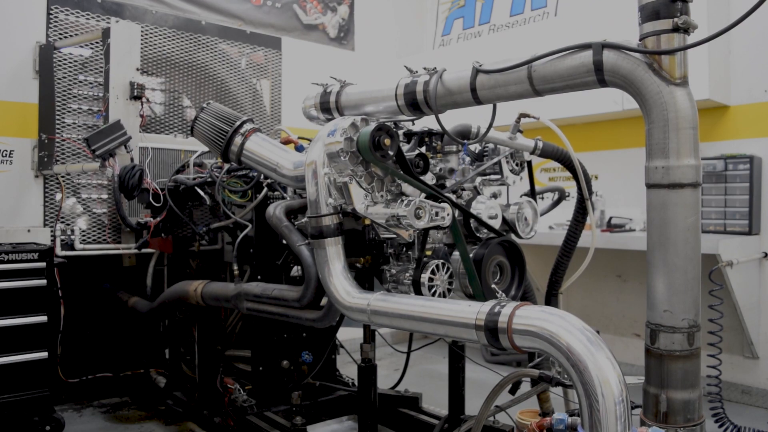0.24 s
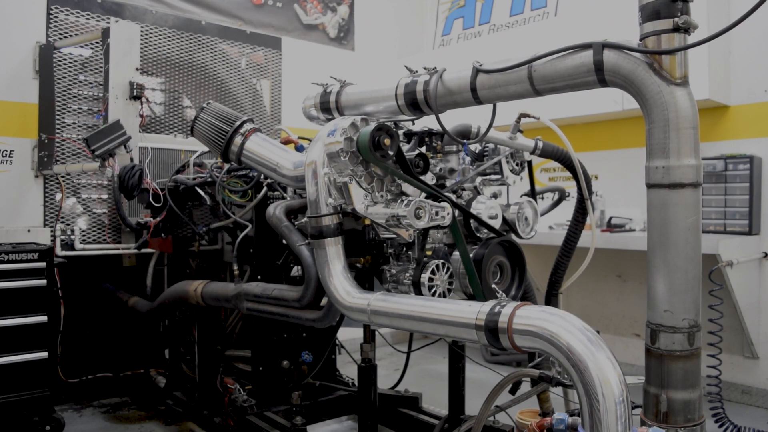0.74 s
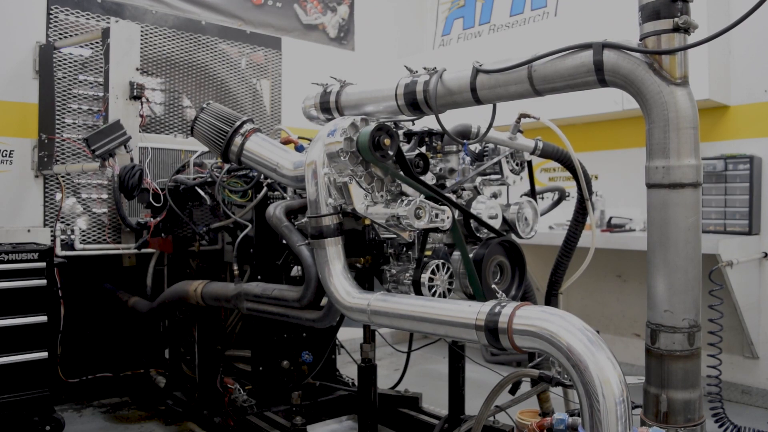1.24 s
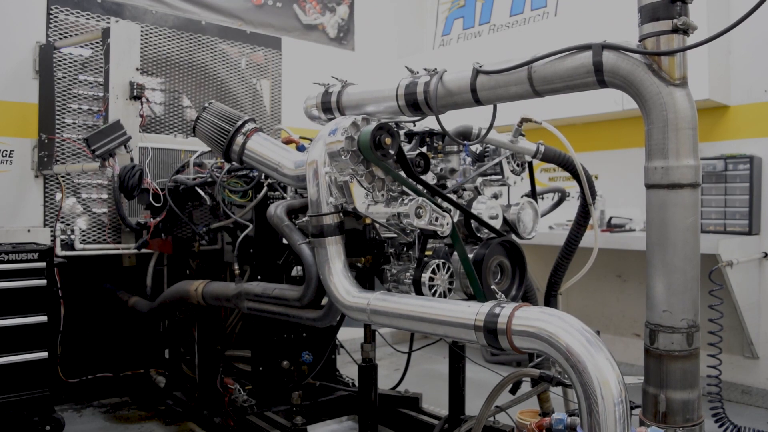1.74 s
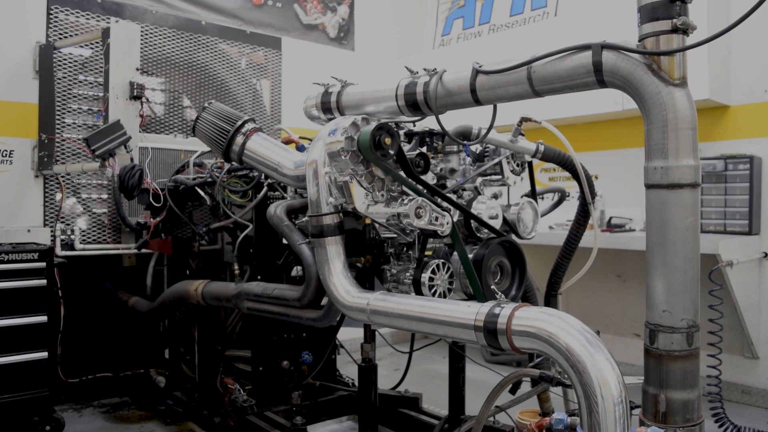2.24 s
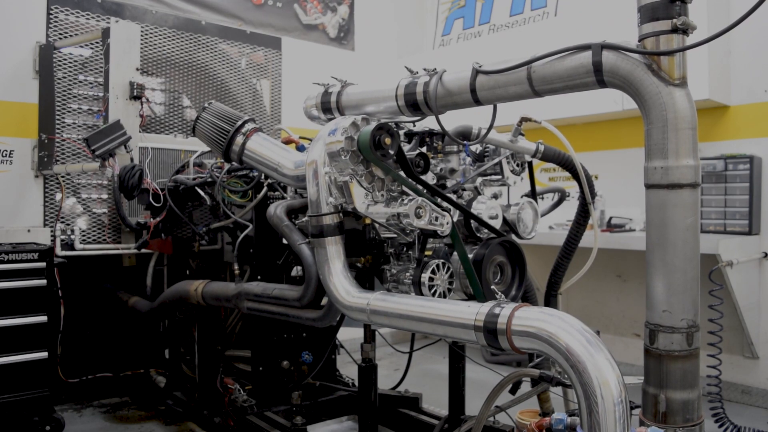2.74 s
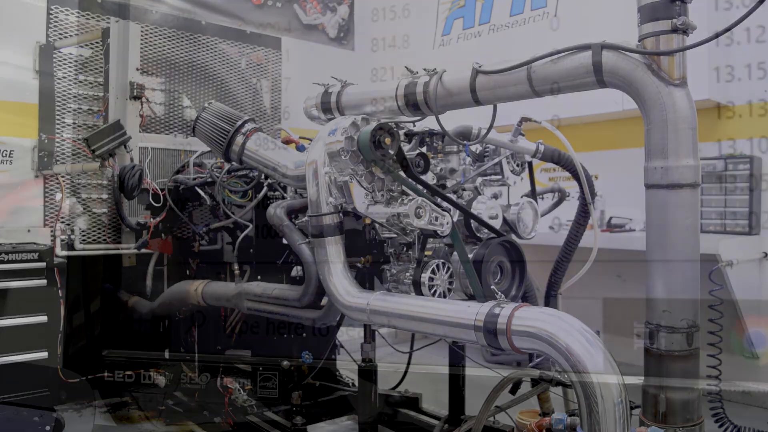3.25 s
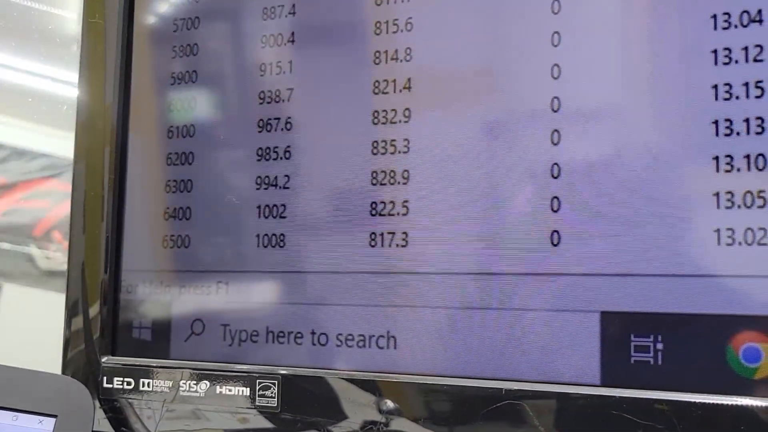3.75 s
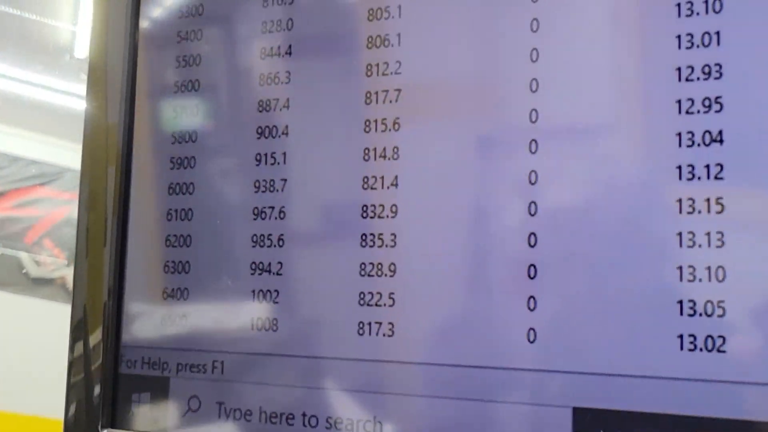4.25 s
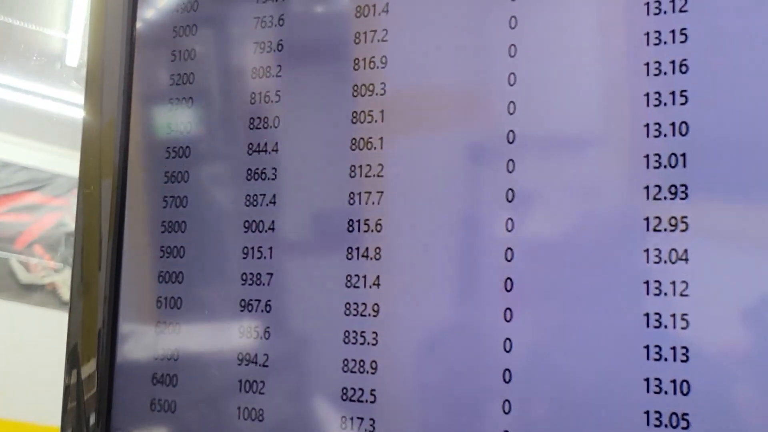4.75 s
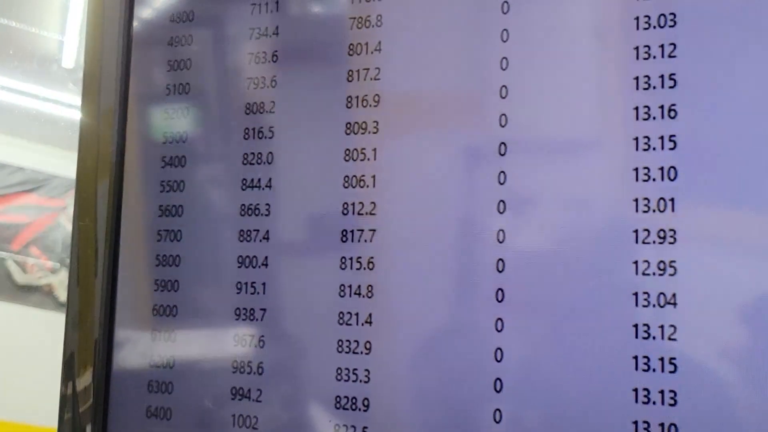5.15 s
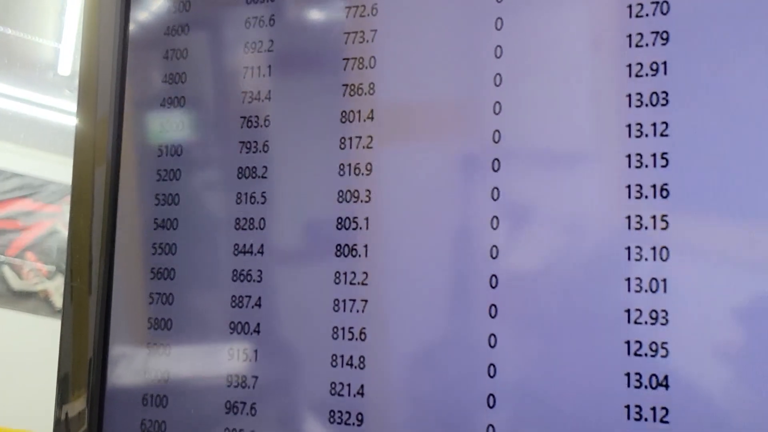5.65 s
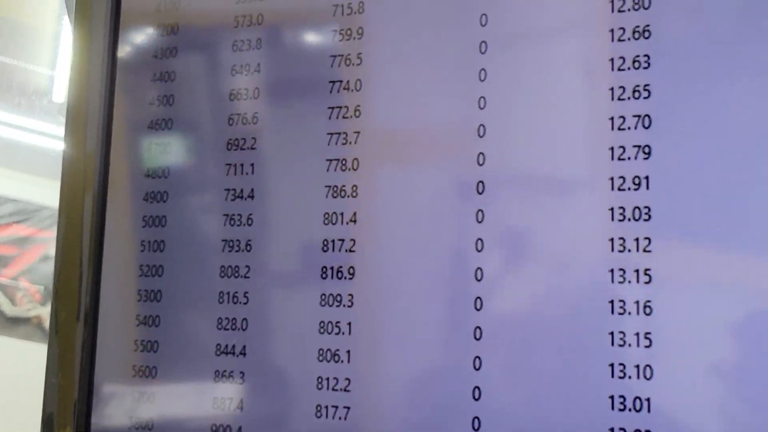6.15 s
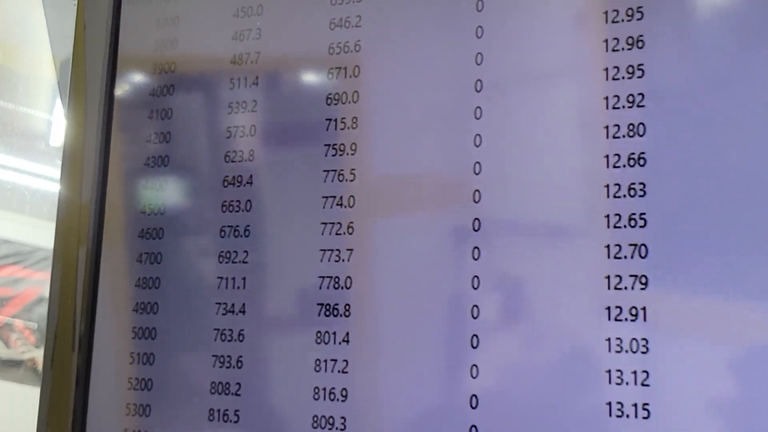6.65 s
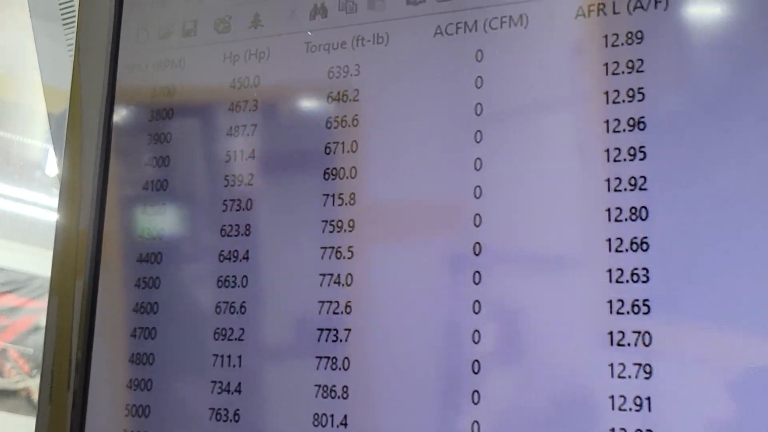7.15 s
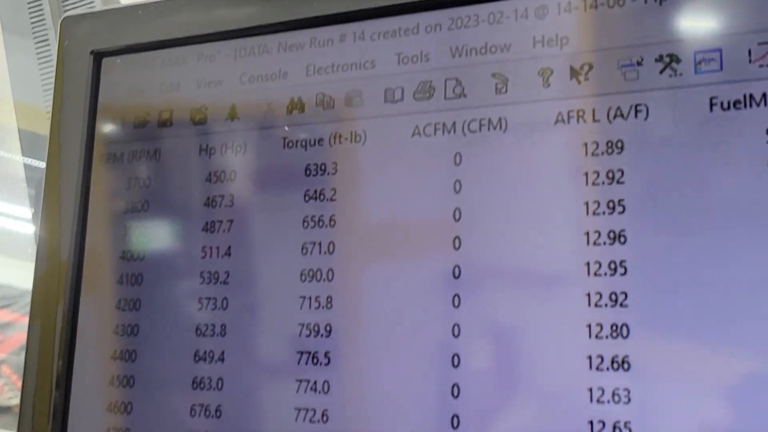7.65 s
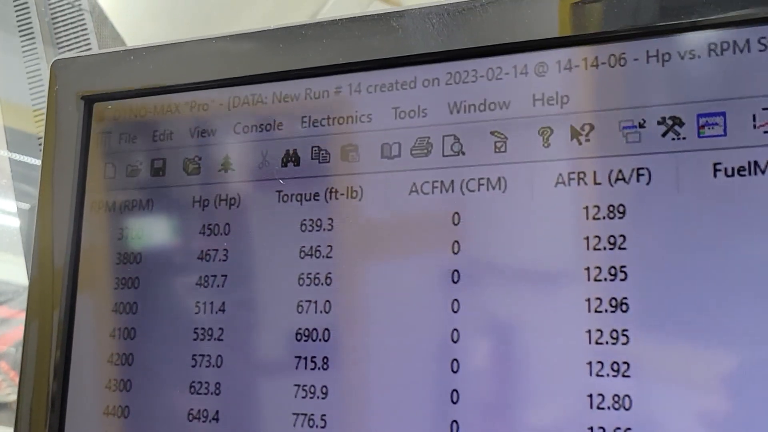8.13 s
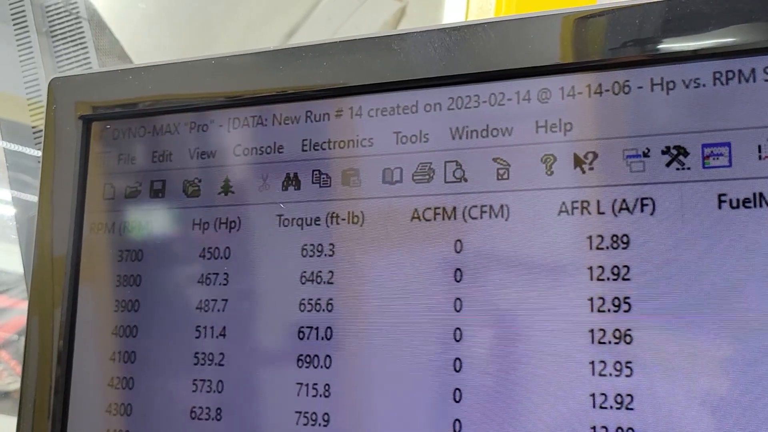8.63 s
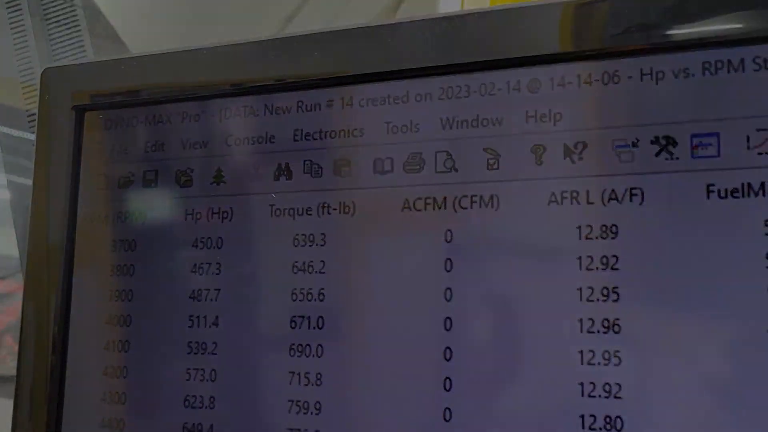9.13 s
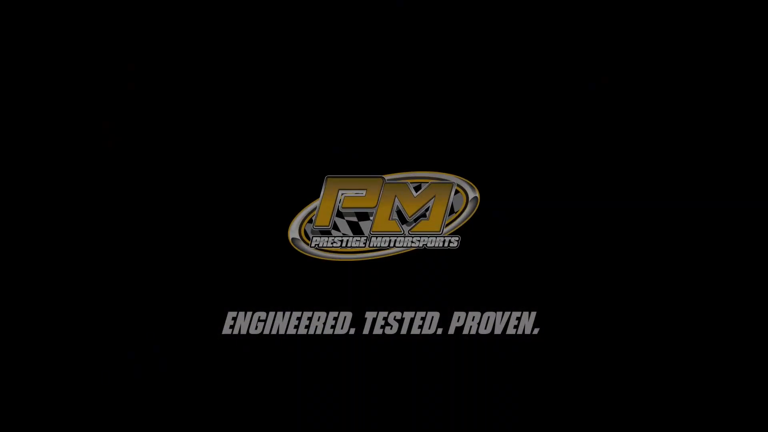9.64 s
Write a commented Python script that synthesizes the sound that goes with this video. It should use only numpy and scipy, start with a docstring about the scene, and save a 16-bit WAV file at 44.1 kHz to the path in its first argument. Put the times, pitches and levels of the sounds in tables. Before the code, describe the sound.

A supercharged V8 on a test stand in a hard-walled room is already at full throttle, a loud, rough roar with a piercing whine, distorting the microphone. The pitch climbs slightly until 0.7 seconds. At about 1 second the throttle eases, and at 1.4 it snaps shut with a sharp bark from the pipes, a few smaller booms and bursts of hissing air. Roar and whine plunge in pitch, and the level falls steeply by 2 seconds. A much quieter fast idle follows, mostly rushing air with ticking valves and a thin, raspy whine. Soft air puffs come between 2.3 and 3.3 seconds, and faint low gusts brush the microphone until about 6. The idle slowly sinks, with a low wavering drone around 5 seconds, then holds over a faint, steady pump hum. The revs sag again just before the end, near 10 seconds.

```python
"""A supercharged V8 on a test stand in a hard-walled cell, heard from one microphone in the room with it.
At the top of a full-throttle pull, uneven firings roar, the blower whines at a multiple of crank speed
and the microphone overloads. On lift-off the bypass valve dumps air and the pipes bark. The engine
drops to a fast idle that sinks: valves tick, a pump hums and stray gusts touch the microphone."""
import sys
import numpy as np
from scipy import signal
from scipy.fft import rfft, irfft, next_fast_len
from scipy.io import wavfile

SR = 44100
rng = np.random.default_rng(int(sys.argv[2]) if len(sys.argv) > 2 else 0)


def transcribe(signal):
    """Save signal, clipped to [-1, 1], as a 16-bit WAV file at the path in sys.argv[1]."""
    frames = np.atleast_2d(signal).T
    limited = np.clip(frames, -1, 1)
    pcm = np.round(limited * 32767).astype(np.int16)
    wavfile.write(sys.argv[1], SR, pcm)


N = 436145
TIME = np.arange(N) / SR

# top of the pull, run-down, rebound, slow sink to idle, last drop: (time [s], crank speed [rpm])
CRANK_SPEED = [(0, 6255), (.4, 6440), (.72, 6650), (1.0, 6555), (1.3, 5706), (1.6, 4737), (1.8, 3435),
               (2.02, 2690), (2.3, 2824), (2.95, 2825), (3.35, 2722), (4.8, 2240), (5.55, 2066),
               (7.6, 2028), (8.7, 1972), (9.5, 2050), (9.7, 1930), (9.89, 1451)]
# levels with the throttle shut:
# (crank speed [rpm], roar [dB], engine orders [dB], bypass air [dB], whine [dB], drone [dB])
OVERRUN_LEVELS = [(1450, -55, -56, -36, -52, -59), (1950, -48, -49, -34.5, -48, -52),
                  (2130, -45, -52, -34, -48, -55), (2190, -44.5, -53, -34, -46, -42.5),
                  (2500, -43.5, -47, -33.5, -52, -56), (2800, -43, -47, -33.5, -49, -45)]
# exhaust roar at the microphone: (frequency [Hz], relative level [dB])
ROAR_SPECTRUM = [(30, -33), (90, -6.5), (160, -2), (240, -1), (350, -2), (600, -2), (1000, 0), (1600, 0),
                 (2400, -1.5), (4000, -4.5), (6300, -3.5), (8300, -8), (10000, -16), (16000, -24)]
# unequal pipes bring out lines between the firing harmonics: (order [x cycle rate], relative level [dB])
ENGINE_ORDERS = [(4, -36), (6, -35), (8, -30), (9, -33), (10, -31), (11, -31), (13, -30), (14, -31),
                 (16, -28), (17, -28), (18, -25), (19, -30), (20, -29), (21, -30), (22, -27), (26, -29),
                 (27, -27), (29, -31), (30, -32), (35, -30), (39, -33), (51, -34), (59, -35)]
# blower tones: (multiple [x whine pitch], level on boost [dB], level with the bypass open [dB])
WHINE_PARTIALS = [(.5, -22, -1), (1, 0, -1), (2, -5, 0), (3.5, -30, -9), (4, -30, -1), (6, -40, -9)]
# how the blower housing radiates: (frequency [Hz], gain [dB])
HOUSING_RESPONSE = [(1900, -14), (2700, -5.5), (3300, 1), (3900, 1.5), (4150, -4), (4600, -1.5), (5500, -2),
                    (6450, 0), (6850, -8), (7500, 0), (8500, 1), (9600, -5), (10900, -11), (11700, -15),
                    (13000, -11), (15000, -6), (16000, -17)]
# air leaving the bypass valve: (frequency [Hz], relative level [dB])
RUSH_SPECTRUM = [(25, -13), (58, -8), (110, 5), (165, -3.5), (230, 1.5), (300, -0.5), (390, 3.5),
                 (700, 1.5), (1500, -2.5), (3000, -5), (5000, -10.5), (7200, -18), (10300, -26),
                 (13000, -28), (16000, -35)]
# duct resonances that the air rings: (frequency [Hz], width [Hz], relative level [dB])
DUCT_MODES = [(8260, 240, -21.5), (8570, 110, -22), (9080, 260, -25)]
# duct ringing within the rush: (time [s], gain [dB])
DUCT_GAIN = [(1.7, 1), (2.0, -5), (3.3, -9), (4.0, 1), (5.1, -3), (6.0, -2)]
# air off throttle, chesty rumble to hiss: (time [s], half-width [s], level [dB], low [Hz], top [Hz])
AIR_BLASTS = [(1.253, 0.057, -21.5, 60, 167), (1.41, 0.023, -23, 60, 170),
              (1.43, 0.027, -19.5, 6500, 14000), (1.544, .022, -29, 4000, 14000),
              (1.677, .05, -36.5, 1450, 11700), (2.36, 0.09, -38, 200, 6000), (2.68, 0.2, -40.5, 200, 6000),
              (3.275, 0.063, -37.5, 200, 5970)]
# booms from the pipes as the throttle shuts: (time [s], half-width [s], pitch [Hz], level [dB])
PIPE_BARKS = [(1.411, 0.015, 560, -11), (1.481, 0.031, 491, -18.5), (1.532, 0.01, 384, -16),
              (1.569, 0.046, 290, -29), (1.663, .03, 213.4, -40), (1.737, 0.04, 634, -38)]
# water pump of the stand: (frequency [Hz], level [dB])
PUMP_TONES = [(78.3, -55), (156.5, -56), (234.8, -52.5), (391.3, -52)]
# stray air on the microphone: (time [s], half-width [s], level [dB], top [Hz])
MIC_GUSTS = [(2.39, .05, -42, 45), (2.48, .04, -45, 65), (2.8, .11, -48, 45), (3.1, .04, -47, 45),
             (3.23, 0.037, -38, 50), (3.32, 0.038, -36.5, 70), (3.8, 0.044, -46, 50), (4.3, .06, -44, 60),
             (4.5, .05, -48, 55), (4.78, 0.12, -47, 60), (5.16, .025, -42, 90), (5.35, .1, -55, 40),
             (5.75, .08, -56, 45)]

IDLE_RPM, HUNT_SHARE, HUNT_PER_S = 2000, .008, 11
EASE_S, EASE_LENGTH_S, SHUT_S = 1.02, .22, 1.405  # the throttle eases, then snaps shut
VALVE_OPENING_S = .36  # the bypass swings fully open once the throttle has eased
# each layer's answer to the throttle: (wide open [dB], eased [dB], fall once shut [dB/s])
ROAR_DRIVE, ORDERS_DRIVE, HOWL_DRIVE = (-4, -8.5, 83), (-8, -11.5, 91), (-22, -11.5, 140)
WHINE_DRIVE, BYPASS_DRIVE = (-11, -15.5, 99), (-28, -14.5, 54)
WHINE_PER_TURN, BOOST_WIDTH_HZ, IDLE_WIDTH_HZ = 58, 33, 60
# a fast run-down widens and weakens the whine, in proportion to its smear
SMEAR_RPM_PER_S, SMEAR_WIDTH_HZ, SMEAR_LOSS_DB = 2900, 260, 7
IDLE_TILT_DB, JET_TILT_DB = .2, 1.3  # bypass brightness per octave: at idle, extra with strong flow
RECORDER_TOP_HZ = 15750


def undb(db):
    """Decibels to gain."""
    return 10 ** (np.asarray(db) / 20)


def unit(x):
    """Scale to rms 1."""
    return x / np.sqrt(np.mean(x ** 2))


def curves(table):
    """The columns of a timed table, sample by sample."""
    times, *columns = np.transpose(table)
    return [np.interp(TIME, times, column) for column in columns]


def response(hz, points):
    """Gain at hz, read from (frequency [Hz], level [dB]) points on a log-frequency axis."""
    points_hz, db = np.transpose(points)
    return undb(np.interp(np.log(hz + 1), np.log(points_hz), db))


def colour(x, points):
    """Filter by a spectrum of (frequency [Hz], level [dB]) points."""
    size = next_fast_len(N + 8192)
    hz = np.arange(size // 2 + 1) * SR / size
    return irfft(rfft(x, size) * response(hz, points), size)[:N]


def walk(per_s):
    """A random wander of rms 1 that turns about per_s times a second."""
    steps = rng.standard_normal(N // 8)
    return unit(np.interp(TIME * per_s, np.arange(len(steps)), steps))


def turns(hz):
    """Running count of cycles."""
    return np.cumsum(hz) / SR


def swell(at_s, half_width_s):
    """A bell-shaped envelope that peaks at 1."""
    return np.exp(-.5 * ((TIME - at_s) / half_width_s) ** 2)


def ring(cycles, width_hz):
    """A resonance kept ringing by turbulence: it fades at random, faster the wider it is."""
    place = turns(np.broadcast_to(1.5 * width_hz, N))
    steps = np.arange(N // 8)
    a, b = (unit(np.interp(place, steps, rng.standard_normal(len(steps)))) for _ in range(2))
    return a * np.cos(2 * np.pi * cycles) + b * np.sin(2 * np.pi * cycles)


def strokes(cycle, count, scatter_db, decay):
    """A sharp rise and decay count times a cycle; each has its own strength and varies every time."""
    index, phase = np.divmod(cycle * count, 1)
    index = index.astype(int)
    recurring = rng.standard_normal(count)[index % count]
    chance = rng.standard_normal(N // 20)[index]
    return undb(scatter_db * (recurring + chance)) * np.exp(-phase / decay)


def puff(at_s, half_width_s, db, low_hz, top_hz):
    """One swell of turbulent air."""
    band = signal.butter(3, [low_hz, top_hz], "band", fs=SR, output="sos")
    return unit(signal.sosfilt(band, rng.standard_normal(N))) * undb(db) * swell(at_s, half_width_s)


def eased():
    """How far the throttle has eased, from 0 (wide open) to 1."""
    return np.clip((TIME - EASE_S) / EASE_LENGTH_S, 0, 1)


def throttle(drive, shut_db):
    """Gain of a layer: held under load, shifted as the throttle eases, then dying away to shut_db."""
    open_db, eased_db, fall_db_per_s = drive
    db = open_db + (eased_db - open_db) * eased() - fall_db_per_s * np.maximum(TIME - SHUT_S, 0)
    return np.hypot(undb(db), undb(shut_db))


def overrun(rpm):
    """Closed-throttle level in dB of each layer at this crank speed."""
    speeds, *columns = np.transpose(OVERRUN_LEVELS)
    layers = ("roar", "orders", "air", "whine", "drone")
    return {name: np.interp(rpm, speeds, db) for name, db in zip(layers, columns)}


def crank():
    """Crank speed in rpm; near idle it hunts at random."""
    rpm, = curves(CRANK_SPEED)
    near_idle = np.minimum(IDLE_RPM / rpm, 1) ** 4
    return rpm * (1 + HUNT_SHARE * near_idle * walk(HUNT_PER_S))


def exhaust(cycle, rpm):
    """Gas tears out at each firing and sets the pipes howling; the engine orders ride on top."""
    shut_db = overrun(rpm)
    cycle = cycle + .016 * eased() * walk(45)  # firing turns ragged as the throttle closes
    firings = strokes(cycle, count=8, scatter_db=1.5, decay=1.0) + .5  # the cell's echo fills the gaps
    roar = unit(colour(firings * rng.standard_normal(N), ROAR_SPECTRUM))
    orders = 0
    for order, db in ENGINE_ORDERS:
        tone = np.sin(2 * np.pi * (order * cycle + rng.random()))
        orders += undb(db) * (tone + .59 * ring(order * cycle, width_hz=10))
    howl = ring(980 * TIME, width_hz=380)
    return (roar * throttle(ROAR_DRIVE, shut_db["roar"])
            + howl * throttle(HOWL_DRIVE, shut_db=-58)
            + unit(orders) * throttle(ORDERS_DRIVE, shut_db["orders"]))


def blower(rpm):
    """Gear and impeller tones: tight on boost, smeared as the engine slows, raspy with the bypass open."""
    opened = np.clip((TIME - EASE_S - EASE_LENGTH_S) / VALVE_OPENING_S, 0, 1)
    slowing = np.maximum(-np.gradient(curves(CRANK_SPEED)[0]) * SR, 0)
    smear = np.minimum(slowing / SMEAR_RPM_PER_S, 1) ** 2 * rpm / rpm.max()
    width_hz = BOOST_WIDTH_HZ + (IDLE_WIDTH_HZ - BOOST_WIDTH_HZ) * opened
    width_hz += SMEAR_WIDTH_HZ * smear * (1 - .5 * opened)
    wobble = .0065 * (IDLE_RPM / rpm) ** 2 * (walk(70) + .6 * walk(18))  # a slow crank turns less evenly
    hz = rpm / 60 * WHINE_PER_TURN * (1 + wobble)
    cycles = turns(hz)
    purity = .67 * (1 - eased()) * (1 - smear)  # a pure core holds only under load
    whine = 0
    for k, boost_db, open_db in WHINE_PARTIALS:
        core = purity * np.sqrt(2) * np.sin(2 * np.pi * k * cycles)
        tone = (core + ring(k * cycles, k * width_hz)) / np.hypot(1, purity)
        gain = undb(boost_db + opened * (open_db - boost_db)) * response(k * hz, HOUSING_RESPONSE)
        whine += tone * gain * (k * hz < SR / 2)
    flutter_db = 1.1 * walk(30)
    loss_db = SMEAR_LOSS_DB * smear * opened
    return whine * throttle(WHINE_DRIVE, overrun(rpm)["whine"]) * undb(flutter_db - loss_db)


def bypass(cycle, rpm):
    """Air spills from the valve, brighter with more flow; the valve train rattles through it."""
    idle_db = overrun(rpm)["air"]
    flow = throttle(BYPASS_DRIVE, idle_db)
    tilt_db = IDLE_TILT_DB + JET_TILT_DB * (1 - undb(idle_db) / flow)
    air = rng.standard_normal(N) * undb(.72 * walk(14))
    ticks = unit(strokes(cycle, count=16, scatter_db=2, decay=.42) * rng.standard_normal(N))
    rush = unit(colour(air + undb(-6) * ticks, RUSH_SPECTRUM))
    low = signal.sosfiltfilt(signal.butter(1, 1500, fs=SR, output="sos"), rush)
    # the two halves lie about an octave and a half either side of the split
    rush = low * undb(-1.5 * tilt_db) + (rush - low) * undb(1.33 * tilt_db)
    duct = sum(undb(db + 1.5 * walk(6)) * ring(hz * TIME, width_hz) for hz, width_hz, db in DUCT_MODES)
    return (rush + duct * undb(curves(DUCT_GAIN)[0])) * flow


def blow_off():
    """Air escapes in separate blasts once the throttle comes back."""
    return sum(puff(*blast) for blast in AIR_BLASTS)


def barks():
    """Short rough booms from the pipes, each sliding down as the gas flow dies."""
    booms = 0
    for at_s, half_width_s, hz, db in PIPE_BARKS:
        cycles = turns(hz * np.exp(-1.5 * np.clip(TIME - at_s, -.1, .1)))
        booms += np.sqrt(2) * np.sin(2 * np.pi * cycles) * undb(db) * swell(at_s, half_width_s)
    return booms * (1 + .7 * walk(130))


def water_pump():
    """The stand's pump hums at a steady pitch, heard once the roar has gone."""
    return sum(undb(db) * unit(np.sin(2 * np.pi * hz * TIME) + .52 * ring(hz * TIME, width_hz=4))
               for hz, db in PUMP_TONES)


def drone(cycle, rpm):
    """A low wavering tone that sinks with the engine."""
    return np.sin(2 * np.pi * 4.1 * cycle) * undb(overrun(rpm)["drone"] + 2 * walk(9))


def gusts():
    """Right at the microphone, each puff of stray air thumps the diaphragm."""
    return sum(puff(at_s, half_width_s, db, low_hz=12, top_hz=top_hz)
               for at_s, half_width_s, db, top_hz in MIC_GUSTS)


def scene():
    """The cell as it sounds at the microphone, the same in both channels."""
    rpm = crank()
    cycle = turns(rpm / (2 * 60))  # two turns to a four-stroke cycle
    engine = exhaust(cycle, rpm) + blower(rpm) + bypass(cycle, rpm) + blow_off() + barks()
    mono = engine + water_pump() + drone(cycle, rpm) + gusts()
    return np.array([mono, mono])


def overload(x, rail, knee):
    """Saturate toward a rail; a higher knee bends more abruptly."""
    return x / (1 + np.abs(x / rail) ** knee) ** (1 / knee)


def record(dry):
    """The microphone saturates, softly upward and hard downward; the recorder blocks DC and cuts the top."""
    x = signal.resample_poly(dry[0], 2, 1)  # oversampled to limit aliasing
    x = np.where(x > 0, overload(x, rail=.53, knee=1.85), overload(x, rail=.49, knee=2.6))
    x = signal.resample_poly(x, 1, 2)
    x = signal.sosfilt(signal.butter(2, 18, "high", fs=SR, output="sos"), x)
    x = signal.sosfiltfilt(signal.ellip(10, .05, 60, RECORDER_TOP_HZ, fs=SR, output="sos"), x)
    return np.array([x, x])


dry = scene()
out = record(dry)
transcribe(out)
```